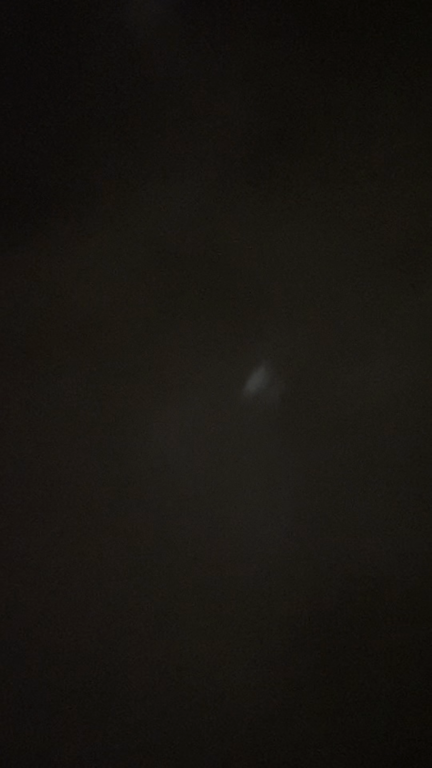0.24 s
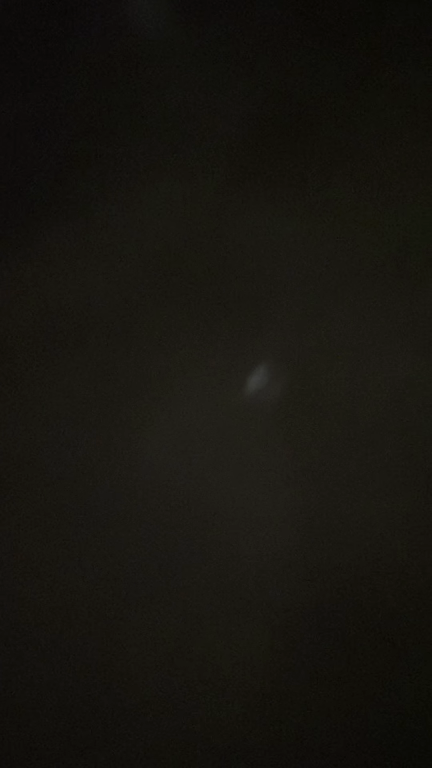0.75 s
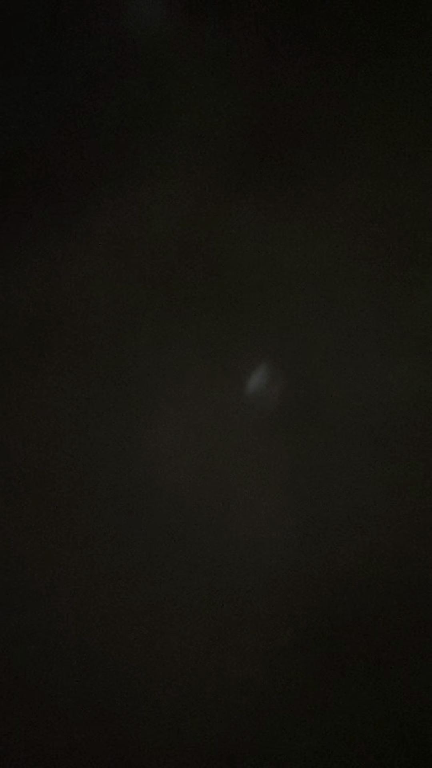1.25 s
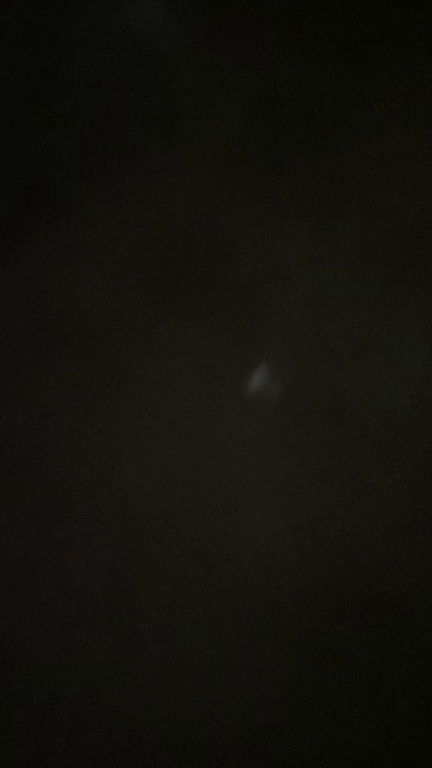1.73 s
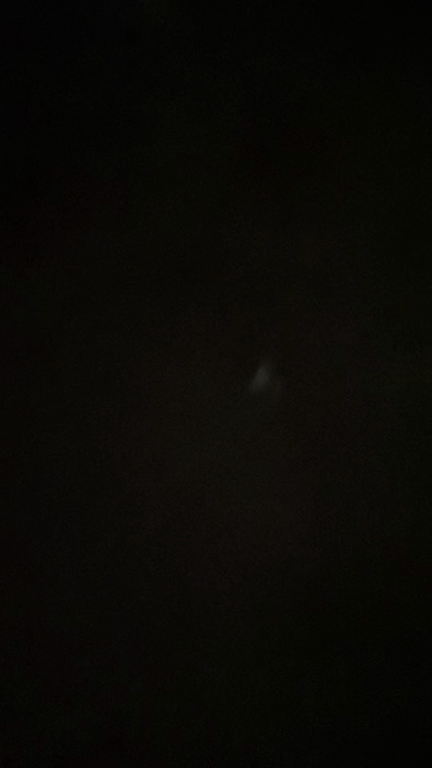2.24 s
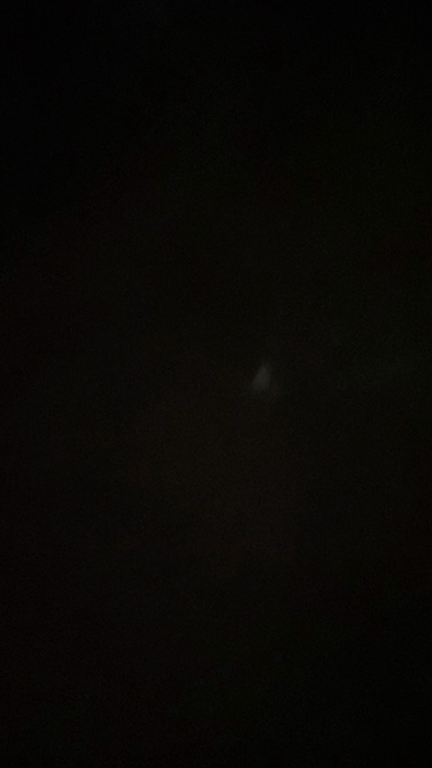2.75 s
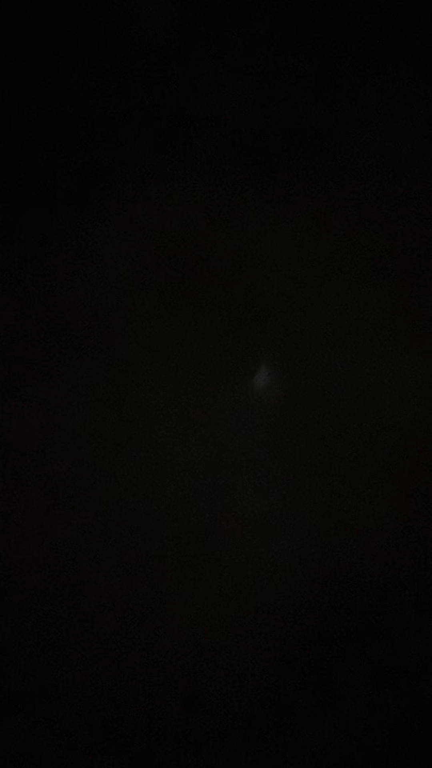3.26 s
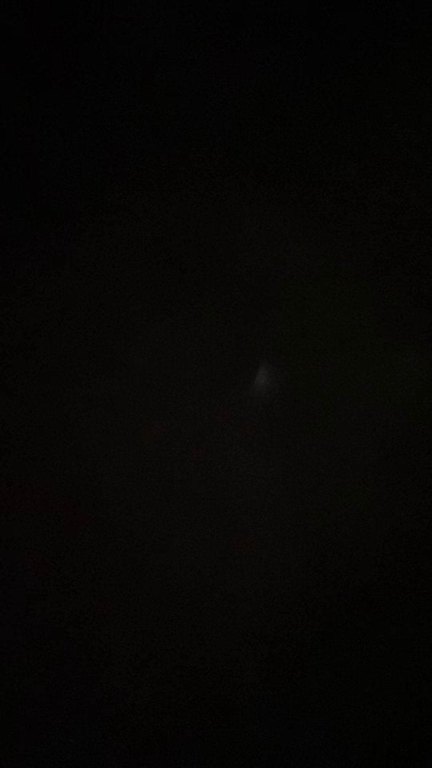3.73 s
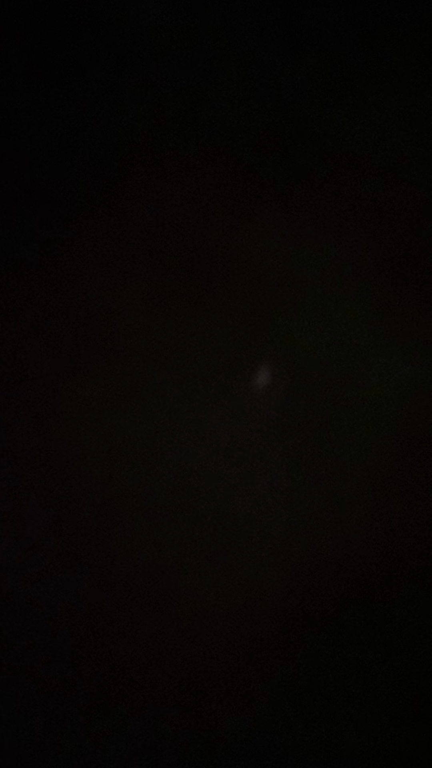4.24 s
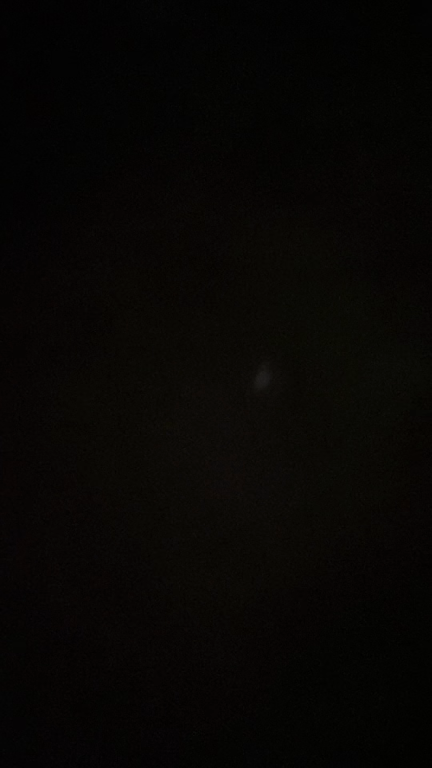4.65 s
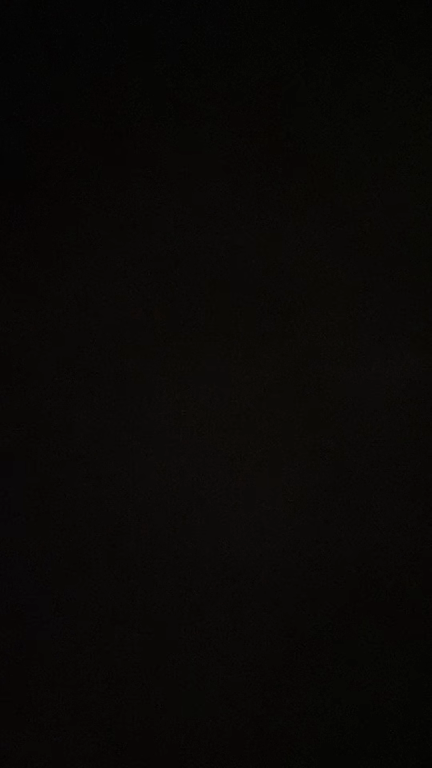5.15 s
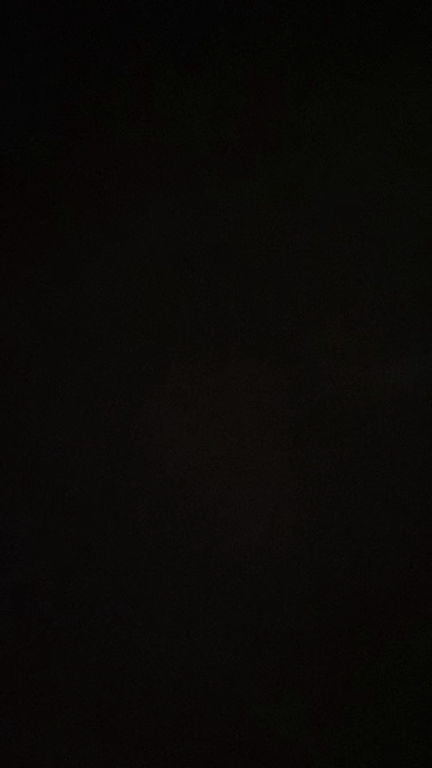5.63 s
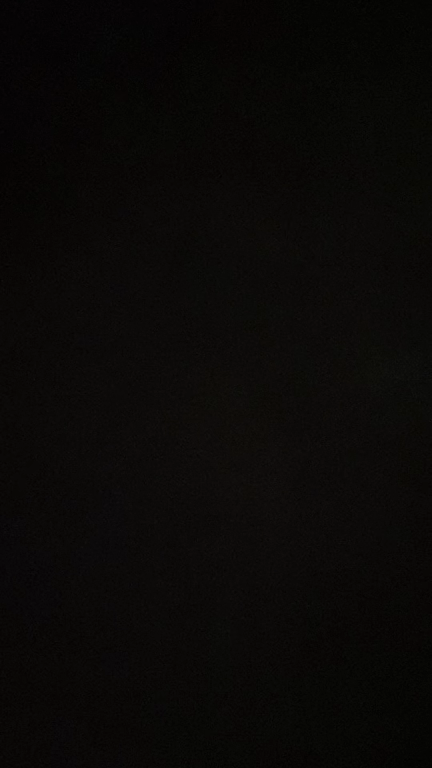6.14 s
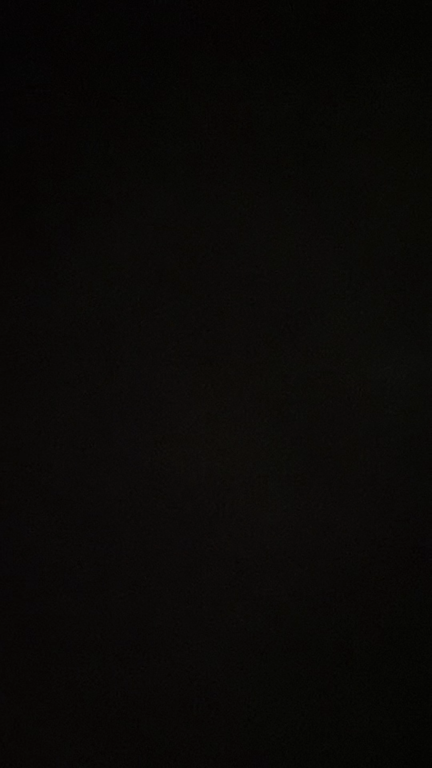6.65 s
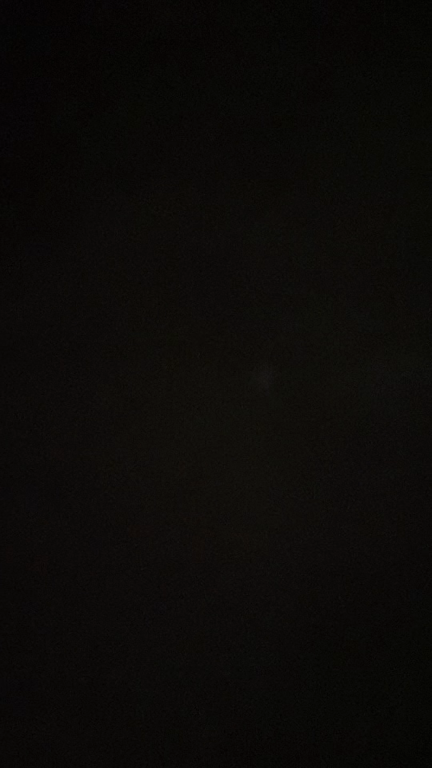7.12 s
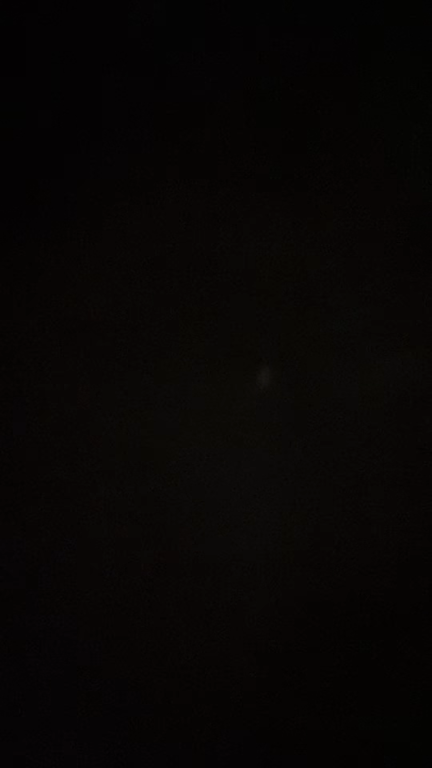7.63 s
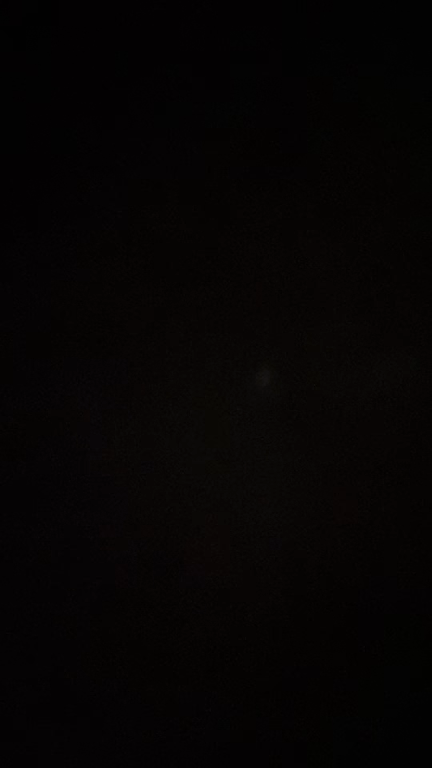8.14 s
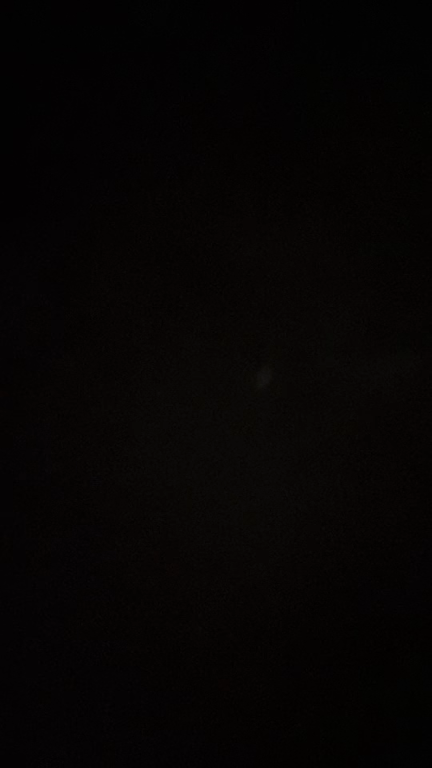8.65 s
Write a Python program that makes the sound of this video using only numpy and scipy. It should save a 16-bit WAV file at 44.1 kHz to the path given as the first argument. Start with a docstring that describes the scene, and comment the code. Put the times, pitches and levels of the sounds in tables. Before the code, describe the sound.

Close stereo sound of a slide hammer working on a car axle in a garage. A quiet, wavering low rumble and faint hiss lie underneath, swelling later. After tiny ticks and a very faint thin tone near 0.8-1.1 s, the steel weight hits its stop at 1.1 s, then harder at 1.7 and 2.6 s. Small knocks, light scrapes and brief squeaks come between. Rattles around 3.0-3.5 s lead to strong clanks at 3.7 and 4.4 s, followed by loose chatter. A lull near 5 s gives way to rattling at 5.6 s and a loud blow at 6.2 s. Sparse ticks and short squeaks follow, then busy rattling from 7.7 s, a blow at 8.2 s and the loudest at 8.7 s, ending in rattles. Every blow is bright, abrupt and quickly damped, preceded by a tiny touch, with short echo and a late, dull body boom.

```python
"""A slide hammer on a car axle: the weight scrapes, squeaks and rattles along its rod and slams into the stop.
Bursts of noise ring the steel modes for dry clanks; the car body's low modes boom late; bumps are panel noise.
Coloured noise makes the swelling low rumble and the hiss, and a sine the faint tone.
Decaying noise bands echo the steel in the garage; the whole is widened to stereo by frequency."""
import sys
import numpy as np
from scipy import signal
from scipy.fft import rfft, irfft
from scipy.io import wavfile
from scipy.ndimage import uniform_filter1d

SR = 44100
rng = np.random.default_rng(int(sys.argv[2]) if len(sys.argv) > 2 else 0)


def wav_out(sig):
    """Save sig, one row per channel (or a flat mono array), as 16-bit PCM at SR to the path in sys.argv[1]."""
    wavfile.write(sys.argv[1], SR, np.round(np.clip(np.atleast_2d(sig).T, -1, 1) * 32767).astype(np.int16))


N = 391608

# hard blows on the stop: t/s, clank level/dB, 3-7 kHz/dB re clank, above 8 kHz/dB re clank, thud/dB re clank,
# boom level/dB, lead of the first touch of the loose stop/s, touch level/dB re blow
HARD_BLOWS = [(1.116, -31.5, 0.5, -7, -23.5, -52, 0.0097, -10.5),
              (1.7091, -25.5, 0.5, -8.5, -20, -41.5, 0.0068, -9.5),
              (2.5696, -23.5, 1, -4.5, -21.5, -40, 0.0035, -8),
              (3.7069, -18, 1, -7, -22.5, -34.5, 0.0044, -5.5),
              (4.3559, -17.5, -1, -6, -19.5, -30.5, 0.0052, -2.5),
              (6.1556, -15.5, -2, -3.5, -25, -40, .0088, -7.5),
              (8.1775, -16.5, 0, -6.5, -22.5, -40.5, 0.011, -8),
              (8.6644, -12, -2.5, -13.5, -23.5, -31, 0.0082, -7)]
# light knocks and rattles on the rod: t/s, clank level/dB, 3-7 kHz/dB re clank, chatter t60/s
LIGHT_KNOCKS = [(.0676, -72, 4, 0.027), (0.3, -56, -10, 0.14), (0.347, -72, -12, .023),
                (0.697, -64, -10.5, 0.012), (.7794, -76, -6, .02), (.8604, -67.5, -12, 0.033),
                (1.052, -66, -1.5, 0.018), (1.3863, -65, -5.5, 0.023), (1.5217, -63.5, -7, .074),
                (1.6097, -65.5, -1, 0.037), (1.6338, -54, 9.5, 0.031), (1.8, -61, -9, 0.015),
                (1.855, -65.5, -11, 0.014), (2.18, -64.5, -10.5, .015), (2.229, -55, -6, 0.13),
                (2.4836, -76, 1, 0.039), (3.03, -41, -3, 0.016), (3.171, -62, -18, 0.012),
                (3.185, -58, -1.5, .017), (3.392, -43, -2.5, 0.031), (3.4201, -48, -12, 0.11),
                (3.4503, -46.5, -1.5, 0.023), (3.5204, -59, -11, 0.048), (3.659, -56, -3, 0.036),
                (3.8367, -54.5, -10.5, 0.025), (3.9858, -48, 1.5, 0.082), (4.1094, -63, -10, 0.026),
                (4.229, -61, -8.5, 0.019), (4.2885, -59, -1, .022), (4.4362, -53, 0, 0.032),
                (4.599, -50, -3.5, 0.035), (4.655, -48, -7, 0.06), (4.6857, -51, -2, .043),
                (4.7235, -45.5, 0, 0.028), (5.3606, -68, 4, .034), (5.4254, -62.5, 0.5, 0.024),
                (5.4932, -74.5, 12, 0.02), (5.5975, -60.5, 2, .06), (5.6149, -49.5, -1, 0.074),
                (5.6326, -45.5, -24, 0.066), (5.6581, -42, -8, 0.041), (5.694, -42.5, -10, .023),
                (5.7756, -48, -11, 0.12), (5.911, -63, -8, .032), (5.9638, -55.5, -10, 0.028),
                (6.0407, -63.5, 0, 0.049), (6.092, -53, -2, 0.037), (6.1889, -50, 5, 0.029),
                (6.4592, -70, 1.5, 0.037), (6.6285, -48.5, -3.5, 0.019), (6.707, -62.5, -17, 0.071),
                (6.981, -56.5, -22.5, .029), (7.055, -59, -4.5, .029), (7.1945, -48, -11.5, .025),
                (7.275, -54, -11.5, 0.027), (7.6574, -57, -14, 0.033), (7.7011, -45, -4, 0.08),
                (7.836, -48, 1.5, 0.08), (7.861, -39, -4.5, 0.042), (7.882, -44.5, -2.5, 0.021),
                (7.992, -47.5, -7, 0.016), (8.105, -55, -7, 0.041), (8.1288, -38.5, 4.5, 0.014),
                (8.2045, -38, 4.5, 0.023), (8.339, -43, -5, .013), (8.445, -42, -7, 0.1),
                (8.4798, -50.5, -11.5, .03), (8.775, -44, -1, 0.0054), (8.8253, -42.5, -1.5, .028),
                (8.858, -47.5, -9.5, 0.018)]
# modes of rod, weight and axle: f/Hz, relative level/dB
STEEL_MODES = [(910, -15), (1760, -18.5), (1960, 0), (2200, 0), (2500, -12.5), (2750, -7.5), (3500, -14),
               (3800, -5), (4300, -9.5), (4600, -8), (5300, -8), (5700, -4.5), (6050, -9), (6500, -8),
               (8550, -11), (8950, -11), (9600, -16), (10500, -20.5), (11450, -4.5), (12200, -14.5),
               (14200, -17)]
# parts of a clank: from f/Hz, to f/Hz, crack t60/s, crack level/dB re ring, trim/dB
CLANK_PARTS = [(200.6, 830, .1, 11.5, 1.5), (635, 1770, 0.008, 2, -11), (1360, 3110, 0.071, -6.5, -0.5),
               (3120, 6400, 0.071, 0, 0), (8740, 12800, .025, -8, 1), (14900, 16200, 0.0097, 8.5, -15)]
# strokes of the weight along the rod: from t/s, to t/s, 3-7 kHz level/dB, 2 kHz level/dB
SLIDE_STROKES = [(0, 0.093, -78.5, -82.5), (0.704, 1.05, -92, -87), (1.39, 1.602, -86.5, -88),
                 (1.75, 1.95, -87.5, -85.5), (2.299, 2.424, -83, -70), (2.469, 2.62, -79.5, -82),
                 (3.403, 3.6, -81.5, -78), (3.748, 3.92, -76, -85.5), (3.997, 4.3, -81, -71.5),
                 (4.39, 4.7, -77.5, -78.5), (5.328, 5.58, -90.5, -78.5), (5.747, 6.102, -82.5, -72.5),
                 (6.186, 6.398, -77.5, -76), (6.55, 6.7, -84.5, -80.5), (7.698, 8.1, -89, -76),
                 (8.2, 8.384, -74.5, -74), (8.405, 8.548, -99, -62), (8.677, 8.88, -73.5, -64.5)]
# the sliding weight sings on one pitch: from t/s, to t/s, f/Hz, level before decay/dB
SQUEAK_NOTES = [(0.687, 1.05, 4400, -95), (2.192, 2.314, 2120, -70), (2.311, 2.381, 1930, -74),
                (2.341, 2.437, 5130, -69), (2.35, 2.436, 9400, -93), (2.485, 2.55, 4870, -66),
                (3.355, 3.548, 2140, -63), (3.641, 3.675, 1910, -55.5), (3.998, 4.07, 2240, -58),
                (4.099, 4.2, 4900, -74.5), (4.092, 4.16, 2740, -66.5), (4.247, 4.298, 2300, -81),
                (4.27, 4.32, 3750, -68.5), (5.332, 5.58, 5630, -77), (5.496, 5.616, 11160, -88),
                (5.8, 5.952, 3370, -71), (5.791, 5.888, 2020, -65.5), (5.902, 5.99, 4800, -70),
                (6.566, 6.629, 5500, -75), (6.616, 6.665, 6500, -66.5), (8.45, 8.55, 2074, -57)]
# modes of the car body: f/Hz, relative level/dB, t60/s
BODY_MODES = [(64.6, -5.5, 0.97), (90, -0.5, 0.6), (108, -2, 0.27), (146, -3.5, 0.14), (169.5, -6, 0.28),
              (252.5, -10.5, 0.28), (303.4, -8, 0.29), (425, -12.5, 0.04), (490, -17.5, 0.12)]
# the rod is jolted and the car's panels answer: t/s, level/dB
PANEL_BUMPS = [(.31, -71), (1.64, -59), (2.23, -75), (3.19, -70), (3.449, -61.5), (5.638, -60.5),
               (7.2, -64), (7.709, -61), (7.871, -56.5), (8.189, -52.5)]
# diffuse echoes: f/Hz, t60/s, level/dB
GARAGE_ECHO = [(500, 0.4, -25.5), (990, 0.27, -26), (2030, 0.26, -22.5), (4300, 0.03, -17.5),
               (10200, 0.12, -13.5), (13000, .1, -19.5), (15000, 0.08, -31)]
# background course: t/s, bass level/dB, hiss level/dB
BACKGROUND_LEVELS = [(0.0, -63.5, -83.5), (0.47, -66, -91.5), (0.89, -77.5, -88.5), (1.88, -58, -87.5),
                     (2.17, -64.5, -90.5), (2.84, -60, -86.5), (3.68, -59.5, -83), (3.88, -52.5, -80),
                     (4.35, -58.5, -72), (4.55, -49.5, -78), (5.04, -57.5, -80.5), (5.74, -50, -73),
                     (6.01, -53.5, -76), (6.3, -50.5, -77), (6.8, -55, -74), (7.49, -52, -76.5),
                     (8.71, -52, -77), (8.88, -43, -75)]
# bass spectrum: f/Hz, relative level/dB per Hz
BASS_SPECTRUM = [(12, -48), (20, -16.5), (48, 0), (97, 0), (184, -7.5), (215, -9), (245, -12.5), (290, -18),
                 (600, -28.5), (780, -65), (1320, -120)]
# garage resonances in the bass: f/Hz, width/Hz, lift/dB
GARAGE_RESONANCES = [(57, 4, 0.5), (76, 17, 7), (133.6, 5.5, 9.5), (185, 10, 6.5), (250, 8, 11.5)]
# bass difference between the channels: f/Hz, relative level/dB per Hz
BASS_SIDE_SPECTRUM = [(20, -10), (80, 0), (200, -6), (500, -10), (900, -30), (3000, -45), (7000, -90)]
# hiss spectrum: f/Hz, relative level/dB per Hz
HISS_SPECTRUM = [(250, 0), (500, -4), (900, -6), (1200, -6.5), (2000, -5), (2700, -8), (3200, -17),
                 (6500, -24), (7400, -42), (12000, -44), (13500, -56)]
# peaks in the hiss: f/Hz, width/Hz, lift/dB
HISS_PEAKS = [(897, 110, 13), (1410, 200, 4)]
# stereo widening of the whole sound: f/Hz, phase lead of left/rad, left minus right level/dB
STEREO_WIDENING = [(860, 1.5, 3), (1260, -2.5, 0), (2050, 0.5, -1.5), (2440, 1.5, 1.5), (3670, 2, -0.5),
                   (4280, 1, 3), (4930, 1.5, 0), (6602, 1.5, 0.5), (10680, 7.5, -0.5), (14400, 9.5, -0.5),
                   (16700, 8.5, 0.5)]

STEEL_T60_S = .04  # hand and clamped parts damp the ring at once; shorter above 6 kHz
KNOCK_THUD_DB = -17  # re clank
KNOCK_TOP_DB, TOP_PER_BRIGHT_DB = -14, 1.54  # a knock's top climbs with its 3-7 kHz
SLIDE_ATTACK_S, SLIDE_RELEASE_S = .03, .06
RUN_UP_DB = -33.5  # run-up scrape re clank
WOBBLE_DB = 7
BODY_LAG_S = .028  # the heavy body takes this long to swing up
PANELS_DB, BOOM_SIDE_DB = -4.5, -19  # re body modes
BUMP_SWELL_S, BUMP_T60_S, BUMP_SIDE_DB = 0.0094, .2, -11
LOW_CUT_HZ, TOP_HZ = 40, 16500


def undb(db):
    """Gain of a dB value."""
    return 10 ** (np.asarray(db) / 20)


def unit(x):
    """Scaled to rms 1."""
    return x / np.sqrt(np.mean(x ** 2))


def band(x, lo_hz, hi_hz, order=3):
    """Butterworth band-pass."""
    sos = signal.butter(order, [lo_hz, min(hi_hz, .45 * SR)], "band", fs=SR, output="sos")
    return signal.sosfilt(sos, x)


def fade(t, t60_s):
    """Falls 60 dB in t60_s seconds."""
    return np.exp(-np.log(1000) * t / t60_s)


def seconds(length_s):
    """Time axis of a short event."""
    return np.arange(int(length_s * SR)) / SR


def curve(table, column):
    """One column of a time table at every sample."""
    table = np.array(table)
    return np.interp(np.arange(N) / SR, table[:, 0], table[:, column])


def walk(rate_hz):
    """Random levels, rate_hz per second, joined by ramps; spread a little under 1."""
    k = int(SR / rate_hz)
    return uniform_filter1d(np.repeat(rng.standard_normal(N // k + 1), k), k)[:N]


def noise(points, peaks=()):
    """Noise coloured by (Hz, dB) points and lifted at (Hz, width, dB) resonances."""
    hz = np.arange(N // 2 + 1) * SR / N + 1
    points = np.array(points)
    db = np.interp(np.log(hz), np.log(points[:, 0]), points[:, 1])
    for peak_hz, width_hz, lift_db in peaks:
        db = db + lift_db / (1 + (2 * (hz - peak_hz) / width_hz) ** 2)
    return irfft(rfft(rng.standard_normal(N)) * undb(db), N)


def ring(modes, t, scatter_db, detune):
    """One impulse response of a set of modes, each caught differently by every contact."""
    hz, db, t60_s = np.transpose(modes)[:, :, None]
    level_chance, pitch_chance, phase_chance = rng.standard_normal((3, len(modes), 1))
    gain = undb(db + scatter_db * level_chance)
    phase = 2 * np.pi * hz * (1 + detune * pitch_chance) * t + 2 * phase_chance
    return (gain * np.sin(phase) * fade(t, t60_s)).sum(axis=0)


def add(out, x, s):
    """Mixes x into out from s seconds on."""
    i = int(s * SR)
    out[i:i + len(x)] += x[:N - i]


def clank(db, mid_db, high_db, thud_db, chatter_s):
    """The faces chatter briefly: a rough burst of tiny contacts rings the steel and cracks in every band."""
    t = seconds(.15)
    chatter_s = max(chatter_s, .002)
    ring_contacts, crack_contacts = rng.standard_normal((2, len(t))) * np.minimum(t / 0.0007, 1)
    modes = [(hz, mode_db, STEEL_T60_S * min(1, 6000 / hz)) for hz, mode_db in STEEL_MODES]
    response = ring(modes, t, scatter_db=5.0, detune=0.027)
    rung = signal.fftconvolve(ring_contacts * fade(t, chatter_s), response)[:len(t)]
    out = 0
    part_levels_db = (thud_db, 0, 0, mid_db, high_db, high_db)
    for (lo_hz, hi_hz, t60_s, crack_db, trim_db), above_db in zip(CLANK_PARTS, part_levels_db):
        crack = crack_contacts * fade(t, chatter_s + t60_s)
        part = unit(band(rung, lo_hz, hi_hz)) + undb(crack_db) * unit(band(crack, lo_hz, hi_hz))
        # the loudest 3.4 ms set the level
        loudest = np.sqrt(uniform_filter1d(part ** 2, size=150).max())
        out = out + undb(db + above_db + trim_db) * part / loudest
    return out


def hammer():
    """Steel struck by steel: blows with their first touches, and the lighter knocks."""
    out = np.zeros(N)
    for s, db, mid_db, high_db, thud_db, _, ahead_s, touch_db in HARD_BLOWS:
        add(out, clank(db + touch_db, mid_db, high_db, thud_db, chatter_s=0.0055), s - ahead_s)
        add(out, clank(db, mid_db, high_db, thud_db, chatter_s=0.0089), s)
    for s, db, mid_db, chatter_s in LIGHT_KNOCKS:
        high_db = KNOCK_TOP_DB + TOP_PER_BRIGHT_DB * mid_db
        add(out, clank(db, mid_db, high_db, KNOCK_THUD_DB, chatter_s), s)
    return out


def scrape():
    """Stick-slip: dense uneven grains excite the steel; each mode comes and goes as the weight wobbles along."""
    t = np.arange(N) / SR
    high_gain, low_gain = 0, 0
    for start, end, high_db, low_db in SLIDE_STROKES:
        edges = np.minimum((t - start) / SLIDE_ATTACK_S + .5, (end - t) / SLIDE_RELEASE_S + .5)
        stroke = np.clip(edges, 0, 1)
        high_gain = high_gain + undb(high_db) * stroke
        low_gain = low_gain + undb(low_db) * stroke
    for s, db, *_, ahead_s, _ in HARD_BLOWS:
        # the weight speeds up into the stop
        ahead = np.maximum(s - ahead_s - t, 0)
        run = undb(db + RUN_UP_DB) * (t < s) * (fade(ahead, 0.13) + undb(7.5) * fade(ahead, .05))
        high_gain, low_gain = high_gain + run, low_gain + run
    grains = rng.standard_normal(N) * undb(0.87 * rng.exponential(size=N) + 3.3 * walk(40))
    modes = []
    for hz, db in STEEL_MODES:
        tone = unit(band(grains, hz * .975, hz * 1.025, order=1))
        modes.append((hz, undb(db + WOBBLE_DB * walk(12)) * tone))

    def group(lo_hz, hi_hz):
        """The modes within a band, at rms 1."""
        return unit(band(sum(x for hz, x in modes if lo_hz < hz < hi_hz), lo_hz, hi_hz, order=4))

    high = group(3000, 7000) + undb(-18) * group(8000, 13000)
    return low_gain * group(1500, 3000) + high_gain * high


def squeaks():
    """The sliding weight sings: narrow rough noise bands that start quickly and die away."""
    out = np.zeros(N)
    flutter = undb(4 * walk(50))
    for start, end, hz, db in SQUEAK_NOTES:
        t = seconds(end - start)
        shape = np.minimum(t / .008, 1) * np.sqrt(1 - t / (end - start))
        shape = shape * flutter[int(start * SR):][:len(t)]
        tone = unit(band(rng.standard_normal(len(t)), hz * .983, hz * 1.017, order=1))
        add(out, undb(db) * shape * tone, start)
    return out


def boom():
    """Each blow shakes the car body, whose low modes swell late and stay; loose panels fill in between them."""
    out = np.zeros((2, N))
    t = seconds(.8)
    swell = np.minimum(t / BODY_LAG_S, 1) ** 2
    for s, *_, boom_db, _, _ in HARD_BLOWS:
        shake = rng.standard_normal((3, len(t)))
        response = ring(BODY_MODES, t, scatter_db=3.0, detune=0.03)
        body = signal.fftconvolve(shake[0] * fade(t, 0.1), response)[:len(t)]
        panels = band(shake[1:], 60, 250, order=2) * fade(t, 0.28)
        mid = unit(body) + undb(PANELS_DB) * unit(panels[0])
        side = undb(BOOM_SIDE_DB) * unit(panels[1])
        early_rms = np.sqrt(np.mean(mid[:SR // 10] ** 2))
        for channel, swing in zip(out, (mid + side, mid - side)):
            add(channel, undb(boom_db) * swell * swing / early_rms, s)
    return out


def bumps():
    """Jolted panels: band noise that swells and dies, a little unlike in the two channels."""
    out = np.zeros((2, N))
    t = seconds(.3)
    shape = np.minimum(t / BUMP_SWELL_S, 1) * fade(t, BUMP_T60_S)
    for s, db in PANEL_BUMPS:
        mid, side = band(rng.standard_normal((2, len(t))), 180, 450, order=2) * shape
        side = undb(BUMP_SIDE_DB) * side
        early_rms = np.sqrt(np.mean(mid[:SR // 10] ** 2))
        for channel, swing in zip(out, (mid + side, mid - side)):
            add(channel, undb(db) * swing / early_rms, s)
    return out


def garage(x):
    """Diffuse echoes: in narrow bands a dense wash carries the energy on, a little unlike in the two channels."""
    hz, t60_s, db = np.transpose(GARAGE_ECHO)
    wash = rng.standard_normal(N) + 0.43 * rng.standard_normal((2, N))
    out = 0
    for f in 350 * 2 ** np.arange(0, 5.6, .3):
        keep = fade(1 / SR, np.interp(f, hz, t60_s)) ** 2  # energy kept per sample
        power = band(x, f / 1.12, f * 1.12, order=2) ** 2
        energy = signal.lfilter([100 / SR], [1, -keep], power)
        carrier = unit(band(wash, f / 1.2, f * 1.2, order=2))
        out = out + undb(np.interp(f, hz, db)) * np.sqrt(energy) * carrier
    return out


def rumble():
    """A wavering bass, nearly alike in both channels, that booms in the garage's low resonances."""
    mid = unit(noise(BASS_SPECTRUM, GARAGE_RESONANCES))
    side = undb(-21) * unit(noise(BASS_SIDE_SPECTRUM))
    level_db = curve(BACKGROUND_LEVELS, column=1) + 2.5 * walk(8)
    return undb(level_db) * (mid + side * np.array([[1], [-1]]))


def hiss():
    """The brighter background noise: mostly separate in the channels from 240 to 7000 Hz, shared above."""
    shared, left, right = (noise(HISS_SPECTRUM, HISS_PEAKS) for _ in range(3))
    both = shared + 11.0 * band(np.array([left, right]), 240, 7000, order=4)
    level_db = curve(BACKGROUND_LEVELS, column=2) + 0.73 * walk(7.6)
    # the level is that of 870-1200 Hz
    return undb(level_db) * both / np.std(band(both[0], 870, 1200))


def faint_tone():
    """A thin sine that sounds briefly early on."""
    start_s, end_s, hz, rms_db = 0.813, 1.09, 457.6, -75
    t = np.arange(N) / SR
    shape = np.clip(np.minimum((t - start_s) / 0.0094, (end_s - t) / 0.27), 0, 1)
    return np.sqrt(2) * undb(rms_db) * np.sin(2 * np.pi * hz * t) * shape


def scene():
    """Hammer and car in the garage over the background."""
    steel = hammer() + scrape() + squeaks()
    car = boom() + bumps()
    return steel + garage(steel) + car + rumble() + hiss() + faint_tone()


def record(dry):
    """Deepest bass and top cut; widened to stereo: left and right differ in phase and level by frequency."""
    # no phase or level difference below 200 Hz
    hz, lead_rad, left_db = np.transpose([(200, 0, 0)] + STEREO_WIDENING)
    f = np.arange(N // 2 + 1) * SR / N
    half = np.array([[.5], [-.5]])  # each channel takes half the difference
    turn = np.exp(1j * half * np.interp(f, hz, lead_rad)) * undb(half * np.interp(f, hz, left_db))
    low_cut = signal.butter(4, LOW_CUT_HZ, "high", fs=SR, output="sos")
    top_cut = signal.ellip(8, .2, 70, TOP_HZ, fs=SR, output="sos")
    widened = irfft(rfft(signal.sosfilt(low_cut, dry)) * turn, N)
    return signal.sosfilt(top_cut, widened)


dry = scene()
out = record(dry)
wav_out(out)
```